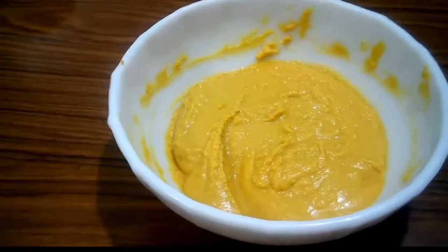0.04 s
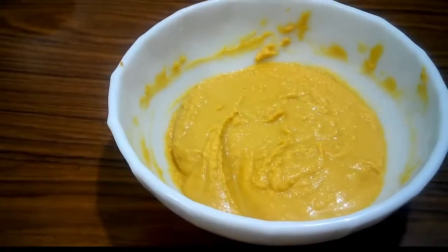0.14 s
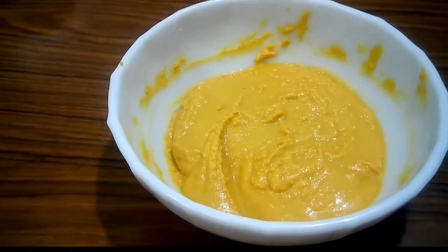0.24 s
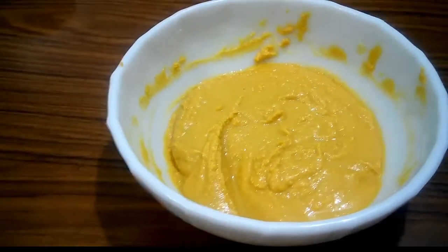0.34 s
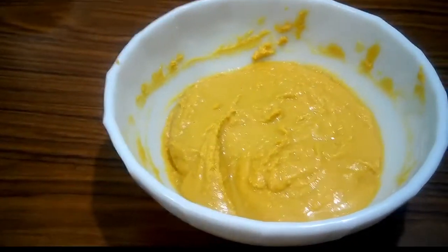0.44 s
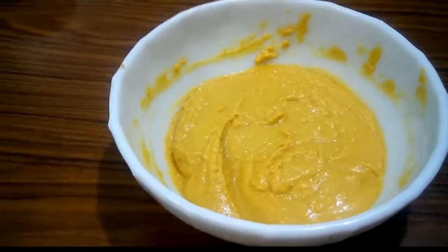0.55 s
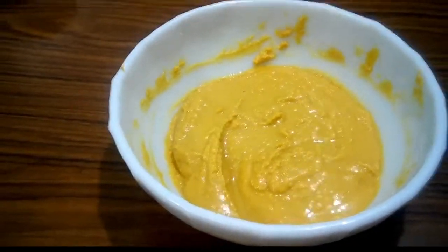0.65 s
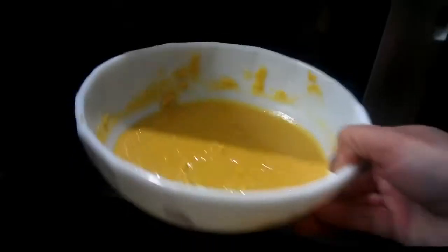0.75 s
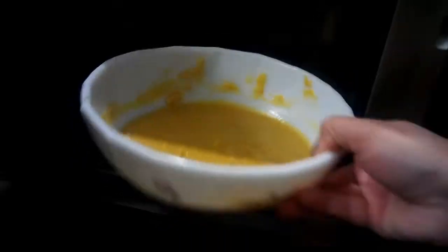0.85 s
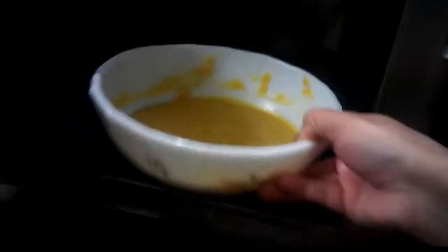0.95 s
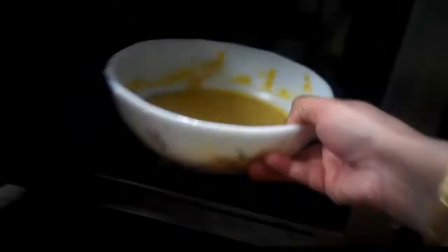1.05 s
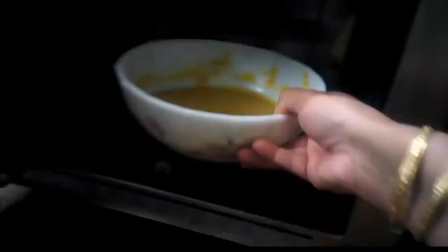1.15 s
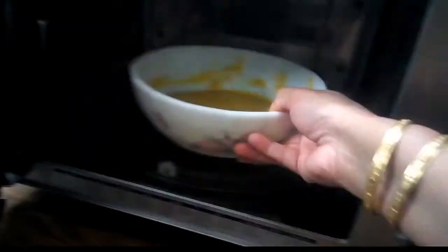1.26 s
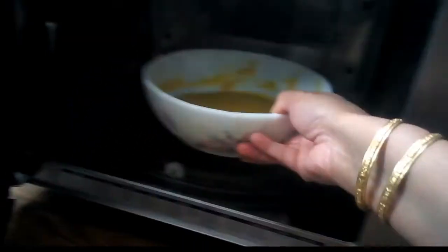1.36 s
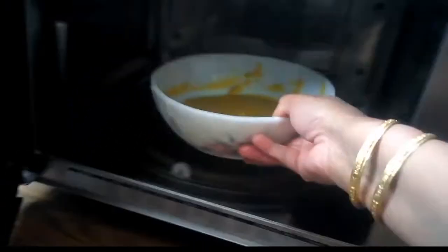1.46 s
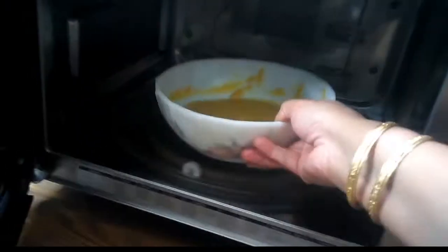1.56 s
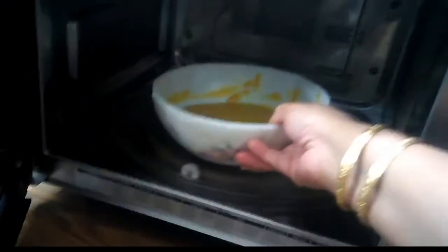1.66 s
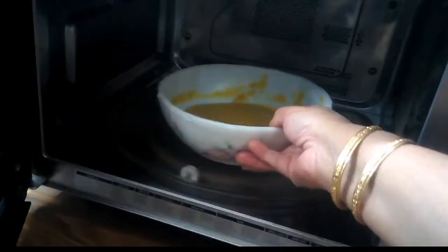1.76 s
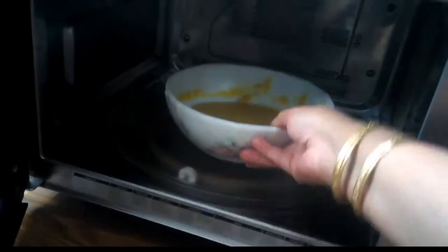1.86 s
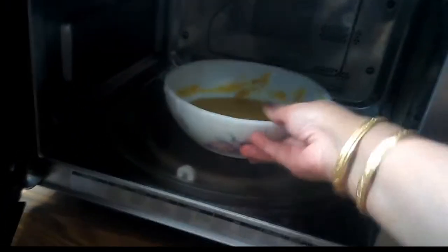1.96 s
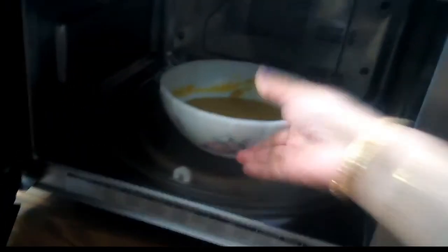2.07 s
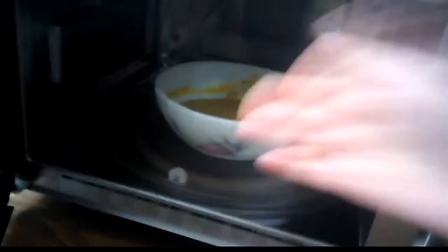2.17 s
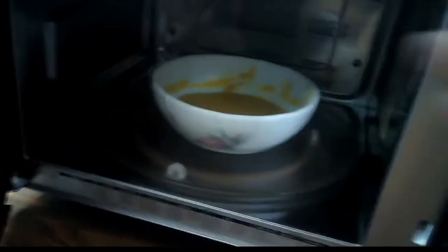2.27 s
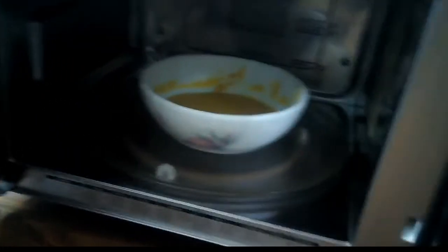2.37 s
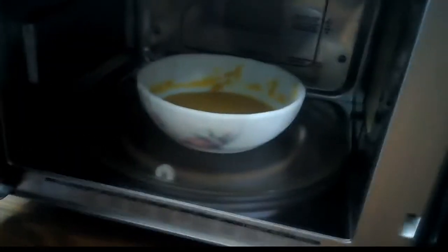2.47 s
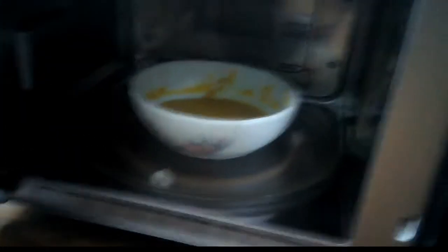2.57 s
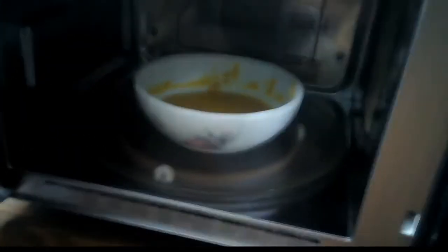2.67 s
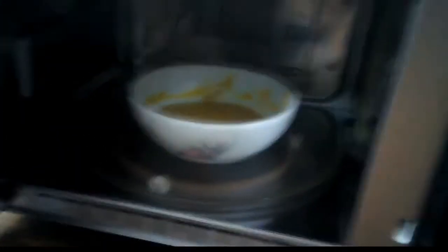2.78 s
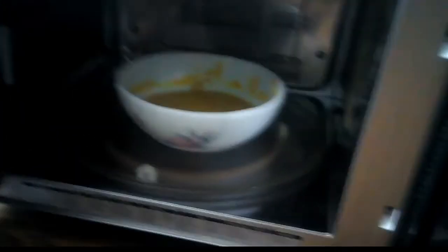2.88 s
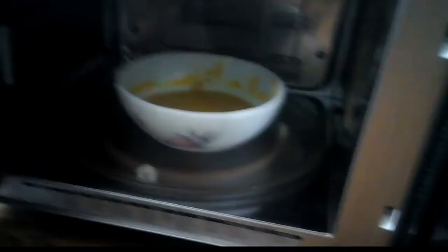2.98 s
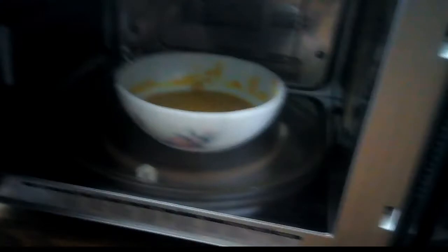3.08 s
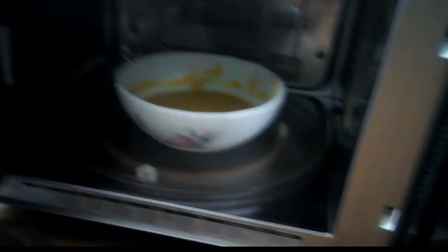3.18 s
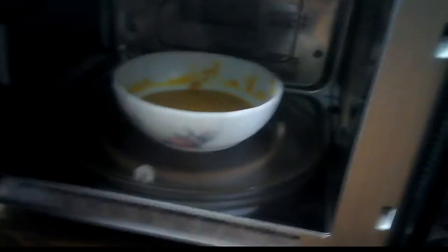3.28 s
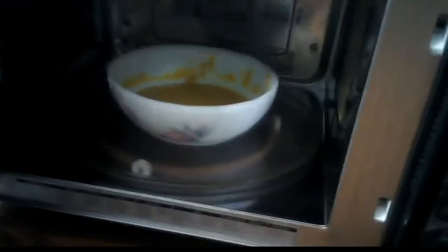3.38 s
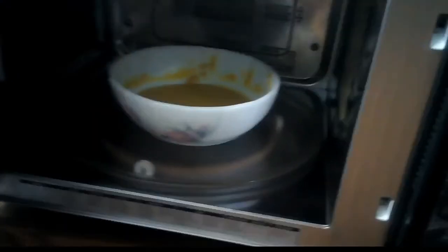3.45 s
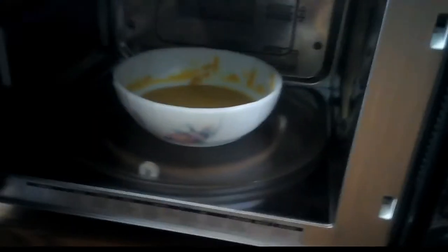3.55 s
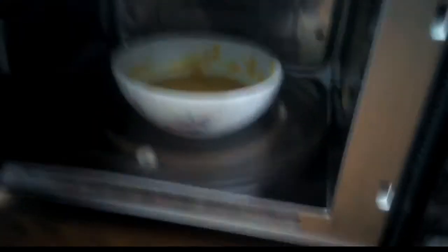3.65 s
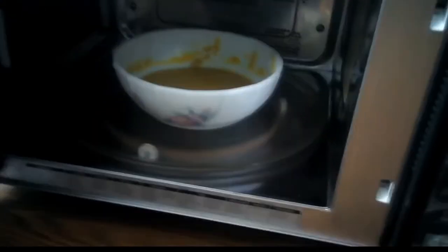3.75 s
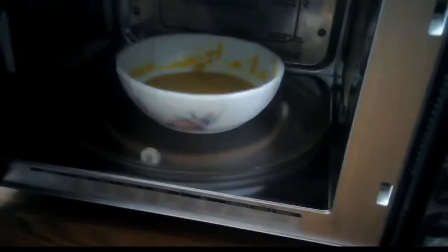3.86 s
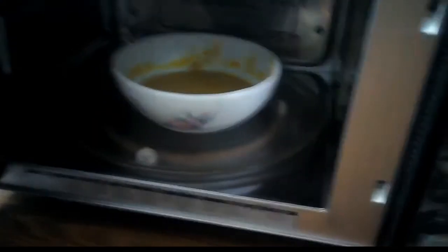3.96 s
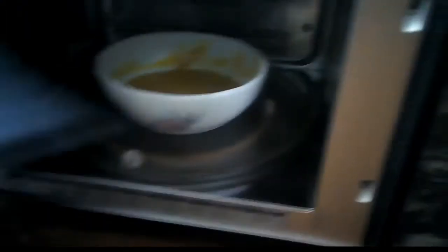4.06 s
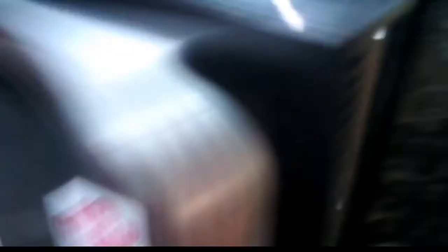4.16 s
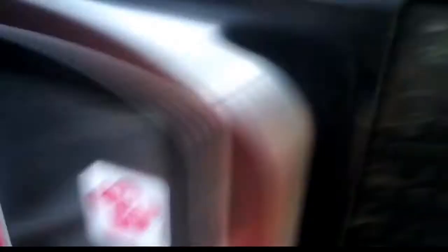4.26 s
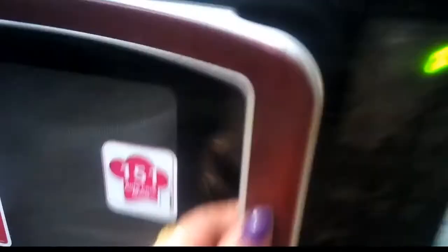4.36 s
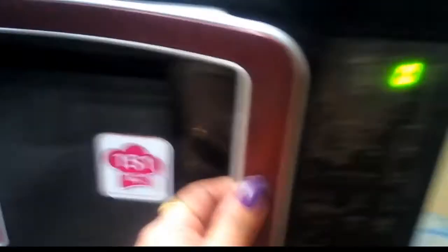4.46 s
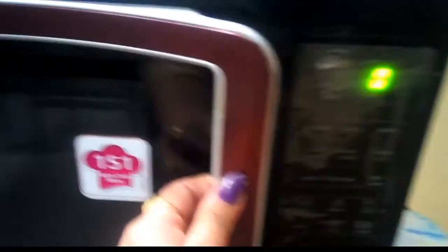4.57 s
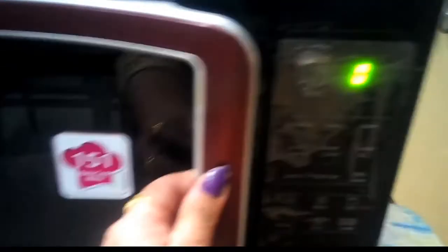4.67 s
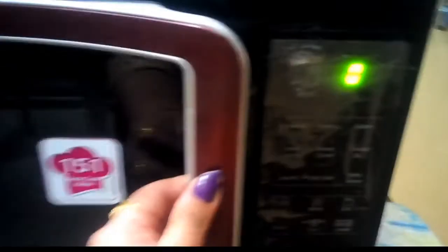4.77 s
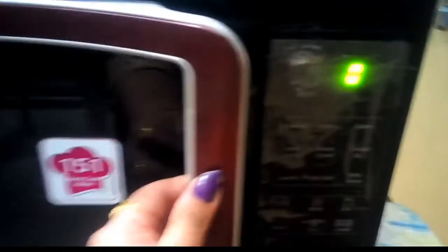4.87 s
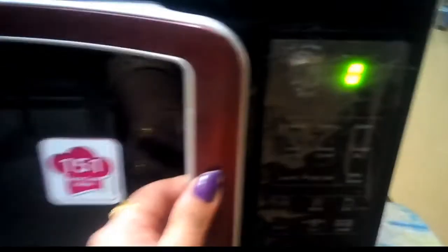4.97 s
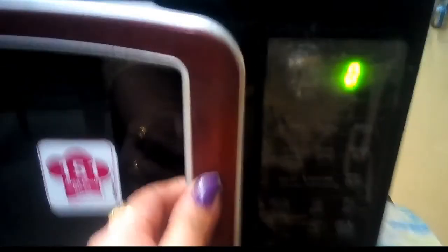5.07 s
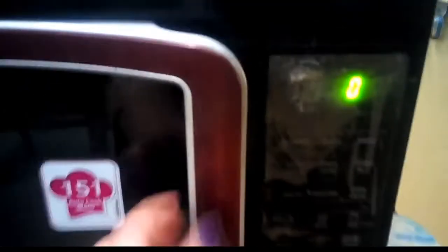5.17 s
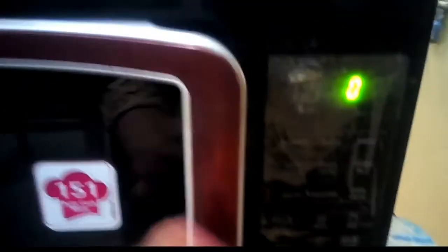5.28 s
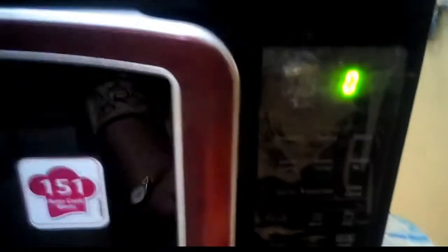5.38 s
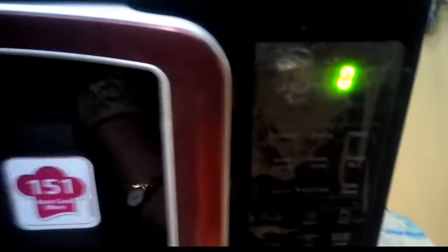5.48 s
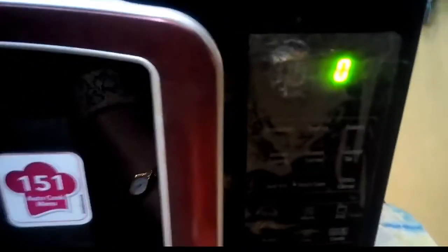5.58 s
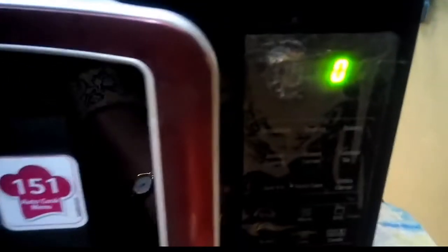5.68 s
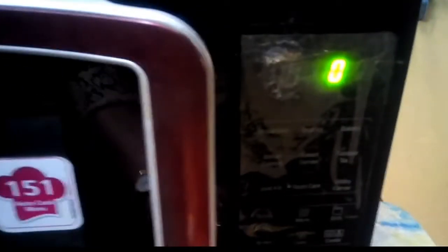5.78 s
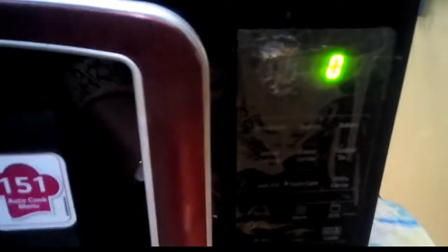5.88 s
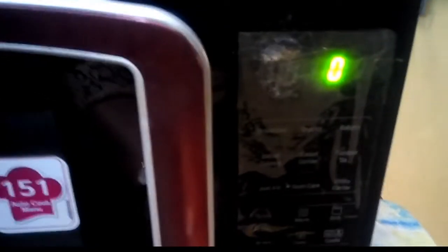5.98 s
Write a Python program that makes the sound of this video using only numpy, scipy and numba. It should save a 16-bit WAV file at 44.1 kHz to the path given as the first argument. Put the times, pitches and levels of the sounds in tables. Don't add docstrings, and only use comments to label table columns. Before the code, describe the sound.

Close phone pickup with soft room tone and hiss. A dry tick, a momentary silence, then a hard glassy clunk as a bowl lands, chatters and rocks on a glass plate inside an oven cavity. Cloth folds rustle and a catch clicks. A dull door knock with light rattle leads to a faint hinge drag, then a scrape and very sharp slam, ringing sheet metal and the tiled kitchen, with tiny settling ticks.

```python
import sys
import numpy as np
from scipy import signal
from scipy.fft import rfft, irfft, next_fast_len
from scipy.io import wavfile
from scipy.ndimage import uniform_filter1d, minimum_filter1d, map_coordinates
from numba import njit

SR = 44100
rng = np.random.default_rng(int(sys.argv[2]) if len(sys.argv) > 2 else 0)


def convert_level_to_amplitude(level_db):
    exponent = np.asarray(level_db, float) / 20
    return 10 ** exponent


def int16_out(signal):
    q = np.round(np.clip(np.atleast_2d(signal).T, -1, 1) * 32767)
    wavfile.write(sys.argv[1], SR, q.astype(np.int16))


N = 265923
T = np.arange(N) / SR

# start in seconds, level in dB, contact length in ms, brightest frequency in Hz.
SET_DOWN = [
    (1.9512, -23.5, 1.45, 9000),
    (1.9545, -12, 3.1, 3520),
    (1.9605, -23, 0.37, 16000),
    (1.9935, -20.5, 7, 2320),
    (2.008, -25, 6.3, 1840),
    (2.015, -19.5, 8, 1760),
    (2.024, -27.5, 8.4, 2330),
    (2.032, -28, 4.6, 2300),
]
ROCKING = [(2.174, -48, 7.5, 3230), (2.194, -50.5, 6.9, 11000), (2.193, -30, 8.6, 1540),
           (2.203, -41, 6.4, 5000), (2.228, -55, 9.8, 9200), (2.245, -52, 7.1, 8700),
           (2.318, -52.5, 240, 3800), (2.353, -52.5, 28, 10500), (2.38, -51, 28, 11000),
           (2.42, -56, 6.8, 7000)]
THUDS = [(1.955, -35, 5.3, 490), (2.192, -33, 28, 810), (2.203, -32.5, 5.4, 700), (2.26, -34.5, 21, 520),
         (2.438, -48, 15.4, 500), (2.55, -54.5, 19, 400), (2.655, -65, 16.3, 888), (2.76, -68, 16.5, 700)]
ROLLER_KNOCKS = [(2.174, -35.5, 0.7, 4010), (2.178, -41, 1, 3983), (2.185, -31.5, 0.79, 3990),
                 (2.192, -42, 2, 2500), (2.1975, -36, 0.99, 2010)]
BUMPS = [
    (1.953, -35.5, 17, 200),
    (2.05, -41, 40, 196),
    (2.2, -32.5, 23, 200),
    (2.33, -42, 36, 200),
    (4.13, -44, 30, 201),
]
# start in seconds, level in dB, contact length in ms, brightest frequency in Hz.
KNOCK = [(4.1105, -53, 13, 821), (4.117, -33, 5.9, 700), (4.139, -36, 2.4, 917), (4.146, -33.5, 3.5, 600),
         (4.152, -29, 3.3, 700), (4.172, -41.5, 3.6, 600), (4.19, -47.5, 9.6, 600), (4.48, -53.5, 24, 885)]
RATTLE = [(4.112, -57, 9.2, 3500), (4.132, -58, 2.4, 5030), (4.139, -44, 0.33, 5170),
          (4.1435, -47, 0.71, 4000), (4.19, -68.5, 10, 3500), (4.83, -63, 10, 1517)]
HOOKS = [
    (4.8485, -46.5, 3.9, 11000),
    (4.853, -34, 8.1, 9860),
    (4.872, -35, 6.2, 9000),
    (4.883, -37, 37, 3960),
    (4.895, -42.5, 19, 4000),
    (4.975, -45, 10, 500),
    (4.997, -39, 2.1, 9000),
    (5.004, -38.5, 12, 12000),
    (5.009, -19.5, 21, 9000),
]
SNAP = [
    (5.0146, -19.5, 0.051, 19150),
]
SETTLING = [(5.338, -48, 0.19, 4470), (5.352, -52, 0.6, 4000), (5.49, -55.5, 0.28, 3000),
            (5.586, -54.5, 0.79, 4400), (5.6, -54, 1, 2600), (5.768, -62.5, 0.15, 4000),
            (5.786, -61.5, 0.22, 6000)]
# start in seconds, level in dB, contact length in ms, brightest frequency in Hz.
TICKS = [(.482, -54, 5.3, 5000), (.4903, -34.5, 0.019, 12000), (.4922, -42.5, 0.045, 9000),
         (.5, -52, 6.7, 4000), (.575, -64, 8, 4000), (.615, -53.5, 0.1, 9000)]
BANGLE = [
    (.978, -62, 3.5, 7000),
    (1.01, -74, 5, 7000),
]
CLICKS = [(2.918, -56, 3.4, 14000), (2.986, -63, .5, 5000), (3.102, -52.5, 0.2, 5900),
          (3.368, -46, 0.084, 3010), (3.6, -56, 3.64, 3980), (3.77, -49, 4.6, 2996), (3.776, -43, 6, 4020),
          (3.787, -35, 2, 19030), (3.793, -46, 2, 6000)]
CATCH_SLIPS = [
    (3.7826, -47, 0.35, 1820),
    (3.7842, -35, 0.066, 2530),
    (3.7865, -46, 0.034, 9000),
    (3.789, -41.5, 0.043, 9000),
]

# frequency in Hz, level in dB, seconds to fade by 60 dB.
BOWL = [(1063, -13, 0.45), (1225, -20, 0.51), (1207, -4.5, 0.18), (1420, -16.5, 0.18), (1489, -9.5, 0.35),
        (1550, -17, 0.15), (2033, -10, 0.4), (2056, -5.5, 0.28), (2156, -11.5, 0.32), (2440, -13.5, 0.26),
        (2638, -22, 0.39), (3018, -8, 0.95), (3017, 1, 0.14), (3260, -9.5, 0.19)]
RIM = [(3560, -24, .07), (4160, -14.5, .15), (4770, -21.5, .4), (4858, -20.5, 0.34), (5483, -16, .24),
       (6611, -40.5, 0.17), (6939, -28.5, 0.082), (7870, -32.5, 0.1), (8489, -30, 0.14),
       (8320, -33.5, 0.16), (9631, -28, .08), (9800, -39.5, 0.5), (9610, -39, .5), (10450, -34, 0.13)]
TILTED_BOWL = [(1006, -27.5, 0.15), (1317, -9.5, 0.1), (2245, 5, 0.06), (3100, 1, 0.13),
               (4230, -5.5, 0.097), (4860, -23.5, 0.22), (5540, -20, 0.15), (8590, -16, 0.19),
               (9670, -11, 0.15)]
PLATE = [(351.5, -23, .6), (438, -23.5, 0.94), (600, -8.5, 0.28), (850, -25, .3)]
LOOSE_PLATE = [(276, -12, .3), (320, 5.5, .05), (325, -12, 0.84), (331.4, -13, 0.5), (375, -21, .3),
               (450.7, -20.5, .2), (598, 1.5, 0.23), (638, -17, .2)]
ROLLER = [(601, -6.5, 0.069), (1068, -1.5, 0.17), (1440, -13, 0.042), (2331, 7, 0.055), (3596, 9, 0.053)]
# frequency in Hz, level in dB, seconds to fade by 60 dB.
DOOR = [(237.3, -14, 0.202), (316, -14.5, 0.11), (385, -15.5, 0.16), (443, -6, 0.06), (657, -11, 0.099),
        (700, -18.5, 0.2)]
CASE = [(85, -6, 0.69), (115.5, -16, 1), (208.6, -16, 0.49), (268, -22, 0.57), (385, -10.5, 0.53),
        (440.7, -9.5, 0.39), (558, -9.5, 0.41), (600, -21.5, 0.14), (696, -26, 0.76), (1016, -14.5, 0.3),
        (1170, -18, 0.52),
        (1910, -14.5, 0.3), (2265, -29, 0.51), (2394, -22, .45), (2570, -23.5, 0.57), (3070, -25.5, 0.3),
         (3280, -22.5, .35)]
LATCH = [(202.5, 5.5, 0.038), (400, 3.5, 0.049), (1310, 4.5, 0.013), (2930, 17.5, 0.011), (4220, 11, .01),
         (5440, 7.5, 0.0092), (10010, 6, .006), (13470, 3.5, 0.0044)]
TRIM = [(2313, -10.5, .3), (2450, -7, 0.27), (2650, 0.5, 0.043), (3500, -7, 0.036), (4400, -5, 0.0195)]
# frequency in Hz, level in dB, seconds to fade by 60 dB.
BANGLE_TONES = [(4570, -3, 0.064), (4740, -5, 0.042)]
CATCH = [(490, -12, 0.031), (1414, -5, 0.0089), (2236, -7, 0.0088), (2846, -13, 0.017), (3340, -1, .015),
         (4500, -14, 0.0088), (5540, -20, 0.022), (6900, -19, .012)]
CREASE = [(2060, -13, 0.037), (2520, 0, 0.021), (2950, -10, 0.13), (3450, -0.5, 0.04)]

# frequency in Hz, level in dB per Hz.
GLASS_TAIL = [(59, -55), (100, -25), (323, -4.5), (923, -19), (1180, -7.5), (2050, -22), (2410, -24.5),
              (3090, -14), (7000, -52.5), (9100, -84.5), (15400, -120)]
WORKTOP = [(30, -10.5), (60, 0), (110, 0.5), (170, -8), (300, -29), (1000, -77)]
# frequency in Hz, level in dB per Hz.
KNOCK_TAIL = [(35, -61.5), (60, -24.5), (172, -37), (242, -2), (320, -23.5), (440, -13), (495, -17),
              (536, -23), (4010, -35.5), (7000, -9), (9100, -99), (15400, -120)]
HINGE = [(70, -17), (140, 11), (260, -8.5), (500, -4.5), (1000, 1.5), (1500, -9), (3000, -13.5),
         (6000, -29)]
GRIT = [(300, -24), (1000, -7), (3000, -4), (4200, -3.5), (7000, -20.5), (11000, -26.5), (15500, -42.5)]
HOOK_TAIL = [(35, -48), (60, -19), (194, 5.5), (310, -27), (432, -1.5), (821, -21.5), (1000, -8),
             (2490, -13.5), (6600, -32.5), (9830, -57), (12000, -57), (15600, -88)]
CRACK = [(88, -28.5), (150, -18.5), (411, 0), (812, -18), (1370, -6.5), (2140, -27), (2920, -0.5),
         (3760, -13), (4310, -16), (5650, -21.5), (8330, -26), (9920, -11), (15500, -42.5)]
SLAM_TAIL = [(50, -43.5), (80, -6), (130, -2), (240, 1.5), (500, -3), (780, -8.5), (1150, -8),
             (1500, -10.5), (2400, -10), (3800, -13), (5200, -26), (7000, -37), (9700, -19), (11300, -34),
             (13500, -31), (15500, -40)]
KITCHEN = [(41, -45.5), (70, -8.5), (150, -3), (411, -14), (504, -15.5), (731, -14.5), (1060, -15.5),
           (2690, -22), (3980, -38), (6000, -37), (7800, -78.5), (13200, -120)]
# frequency in Hz, level in dB per Hz.
TICK = [(120, -47), (200, -20), (641, 6.5), (1840, -8.5), (2290, -1), (3890, -2.5), (4660, 1),
        (5200, -19.5), (8050, -17.5), (9480, -39), (13600, -35), (15500, -51)]
CLICK = [(120, -46), (200, -35), (471, 0.5), (728, -17), (1380, -5), (2560, -10.5), (3360, -4),
         (3820, -14.5), (4580, -6), (6130, -14), (10600, -13.5), (15500, -27)]
CLOTH_LOW = [(410, -32), (700, -15.5), (780, -12), (853, -20), (1050, -9), (1130, -10), (2980, -5),
             (6000, -26), (7800, -53), (13200, -120)]
CLOTH_HIGH = [(3530, -54), (6000, -20), (7950, -11), (9100, -9), (10300, -5.5), (12500, -4.5), (14000, -7),
              (15500, -11)]
AIR = [(15, -51), (25, -15), (133, -6.5), (261, -6.5), (328, -9.5), (576, -10), (772, -10.5), (1040, -14),
       (1160, -15.5), (2860, -20), (5500, -24.5), (7150, -51), (12100, -120)]
HISS = [(3240, -33.5), (5500, -9), (5980, -6), (6630, 1.5), (7240, -2), (7900, 1), (9280, -2), (10700, -5),
        (12600, -5.5), (14900, -7), (15600, -13)]
# frequency in Hz, seconds to fade by 60 dB.
ROOM_T60 = [(60, 1), (150, 0.88), (400, 1), (1000, .85), (2500, 0.79), (4000, 0.8), (6000, 0.4),
            (10000, 0.34), (14000, 0.14)]

# peak in seconds, level in dB, rise and fall in ms per 10 dB.
DRAGS = [
    (4.22, -71.5, 20, 600),
    (4.475, -68.5, 230, 220),
    (4.81, -70, 17, 200),
]
# peak in seconds, level in dB, rise and fall in ms per 10 dB, fibre hiss over fold in dB.
FOLDS = [(.2, -71.5, 23, 130, -15), (.32, -70, 69, 45, -14), (2.94, -64, 10, 73, -12),
         (2.987, -55, 3.1, 64, -7.5), (3.108, -57, 13, 15, -25), (3.136, -50.5, 12.5, 12.5, -1.5),
         (3.199, -71, 51, 122, 2.5), (3.314, -60.5, 24, 19, -19), (3.417, -54.5, 24, 20, -4.5)]
# peak in seconds, level in dB, rise and fall in ms per 10 dB.
WHINE = [(.1, -80, 300, 300), (.33, -91, 100, 100), (.66, -73, 200, 30), (1.0, -82, 120, 100),
         (1.55, -86, 200, 200)]
AIR_DB = -75, -75.5
SCENE_DB = 4, 4.5
BACK_S = 0.732


def bowl():
    down = contacts(SET_DOWN, 480)
    rock = contacts(ROCKING, 276)
    thud = contacts(THUDS, 240)
    rollers = contacts(ROLLER_KNOCKS, 450, clean=True)
    glass = ring(down, BOWL, grip()) + ring(down, RIM)
    glass = glass + convert_level_to_amplitude(3.0) * ring(rock, TILTED_BOWL, longest=0.45)
    plate = convert_level_to_amplitude(-4.5) * ring(down, PLATE) + convert_level_to_amplitude(1) * ring(thud, LOOSE_PLATE)
    cavity = convert_level_to_amplitude(-15.5) * wash(down, GLASS_TAIL, 0.7, 6)
    cavity = cavity + convert_level_to_amplitude(-4.0) * wash(rock + 0.5 * thud, GLASS_TAIL, 0.66, 1.6)
    rub = convert_level_to_amplitude(14) * wash(rock, GLASS_TAIL, 0.051, 0.54)
    worktop = convert_level_to_amplitude(-14) * wash(contacts(BUMPS, 30), WORKTOP, 0.2, 4.4)
    return glass + plate + ring(rollers, ROLLER) + cavity + rub + convert_level_to_amplitude(3.0) * thud + worktop


def grip():
    held, squeeze, free, seated = 2.3, 21, 0.34, 5.5
    late = (T - 2.034) * 1000 / 5.0
    after = np.where(T < ROCKING[0][0], free, seated)
    return np.where(late < 0, held, after) + squeeze * np.exp(-late ** 2)


def door():
    sweep = swells(DRAGS).sum(axis=1) * colour(rng.standard_normal(N), HINGE)
    sound = door_knock() + sweep + door_shutting()
    return signal.lfilter(*signal.butter(5, 100, "high", fs=SR), sound)


def door_knock():
    knock, rattle = contacts(KNOCK), contacts(RATTLE, 1700)
    panel = ring(knock, DOOR) + convert_level_to_amplitude(-11.0) * wash(knock, KNOCK_TAIL, 0.75, 2.1)
    trim = convert_level_to_amplitude(5.5) * wash(rattle, TICK, 0.043, 0.26) + convert_level_to_amplitude(-9.5) * wash(rattle, TICK, 0.59, 4.1)
    return panel + trim


def door_shutting():
    hooks, settle = contacts(HOOKS), contacts(SETTLING, 257)
    snap = contacts(SNAP, 130, clean=True)
    scrape = convert_level_to_amplitude(13.5) * colour(hooks, GRIT) + convert_level_to_amplitude(6.5) * wash(hooks, SLAM_TAIL, 0.057, 0.18)
    scrape = scrape + convert_level_to_amplitude(-8.5) * wash(hooks, HOOK_TAIL, 0.78, 3.8)
    crack = convert_level_to_amplitude(13.0) * wash(snap, CRACK, 0.015, 0.2)
    metal = ring(snap, LATCH) + ring(snap + convert_level_to_amplitude(-4.5) * hooks, CASE)
    slam = crack - metal + convert_level_to_amplitude(-4.5) * wash(snap, SLAM_TAIL, 0.7, 1.7)
    room = convert_level_to_amplitude(-19.5) * wash(snap, KITCHEN, 1.67, 30) + convert_level_to_amplitude(4) * wash(settle, KITCHEN, 0.5, 8)
    return scrape + slam + room + convert_level_to_amplitude(-0.5) * ring(settle, TRIM)


def ticks():
    out = ring(contacts(BANGLE), BANGLE_TONES)
    out = out + ring(contacts(CATCH_SLIPS, 450, clean=True), CATCH)
    for rows, spectrum, tail_db in ((TICKS, TICK, -26), (CLICKS, CLICK, -32)):
        force = contacts(rows, 590)
        out = out + convert_level_to_amplitude(1.0) * wash(force, spectrum, 0.021, 0.29)
        out = out + convert_level_to_amplitude(tail_db) * wash(force, spectrum, 0.41, 4)
    return out


def sleeve():
    grit = rng.standard_normal((2, N))
    size = np.minimum(rng.exponential(size=N), 7)
    folds = colour(grit[0] * convert_level_to_amplitude(1.8 * size), CLOTH_LOW)
    fibres = colour(grit[1] * convert_level_to_amplitude(1.2 * size), CLOTH_HIGH)
    creases = drifting(ring(folds, CREASE))
    folds = convert_level_to_amplitude(-1) * folds / folds.std() + convert_level_to_amplitude(-5.5) * creases / creases.std()
    hiss = swells([(s + 0.0039, db + up, rise, fall) for s, db, rise, fall, up in FOLDS])
    return swells(FOLDS).sum(axis=1) * folds + hiss.sum(axis=1) * fibres / fibres.std()


def drifting(x):
    share, changes_hz = 0.045, 14
    size = int(SR / changes_hz)
    steps = np.repeat(rng.standard_normal(N // size + 1), size)[:N]
    walk = uniform_filter1d(steps, size=size)
    return map_coordinates(x, [np.cumsum(1 + share * walk)], mode="mirror")


def air():
    wander = np.cumsum(0.066 * rng.standard_normal(N))
    whine = np.sin(2 * np.pi * 4120 * T + wander)
    tone = convert_level_to_amplitude(2.5) * colour(rng.standard_normal(N), AIR)
    tone = tone + convert_level_to_amplitude(-0.5) * colour(rng.standard_normal(N), HISS)
    return convert_level_to_amplitude(np.where(T < BACK_S, *AIR_DB)) * tone + swells(WHINE).sum(axis=1) * whine


def contacts(rows, low_hz=100, clean=False):
    size = 2048
    force = np.zeros(N)
    age_ms = T[:size] * 1000
    bass_cut = signal.butter(2, low_hz, "high", fs=SR)
    for (s, db, ms, hz), grit in zip(rows, rng.standard_normal((len(rows), size))):
        age = age_ms / ms
        burst = (1 if clean else grit) * np.sqrt(age) * np.exp(-2.5 * age)
        burst = burst / np.sqrt(np.sum(burst ** 2))
        burst = signal.lfilter(*signal.butter(3, min(hz, 0.45 * SR), fs=SR), burst)
        start = int(s * SR)
        force[start:start + size] += convert_level_to_amplitude(db) * signal.lfilter(*bass_cut, burst)
    return force


@njit
def resonate(x, turn, loss, damping):
    y, z = np.zeros(len(x)), 0j
    for i in range(len(x)):
        z = z * turn * (1 - loss * damping[i]) + x[i]
        y[i] = z.imag
    return y


def ring(force, modes, damping=np.ones(N), longest=1.2):
    out = np.zeros(N)
    for hz, db, t60 in modes:
        turn = np.exp(2j * np.pi * hz / SR)
        loss = np.log(1000) / (min(t60, longest) * SR)
        out = out + convert_level_to_amplitude(db) * resonate(force + 1e-18, turn, loss, damping)
    return out


def wash(force, spectrum, stretch, onset_ms):
    size = 1 << 16
    hz = np.fft.rfftfreq(size, 1 / SR)
    noise = rfft(colour(rng.standard_normal(size), spectrum))
    tail = np.zeros(size)
    for centre in 2 ** np.arange(5.5, 14.6, 0.5):
        band = irfft(noise * np.clip(1 - abs(2 * np.log2((hz + 1) / centre)), 0, 1))
        fade_db = -60 * T[:size] / (stretch * on_log(ROOM_T60, centre))
        tail = tail + band * convert_level_to_amplitude(np.maximum(fade_db, -200))
    tail = tail * (1 - np.exp(-T[:size] * 1000 / onset_ms))
    return signal.oaconvolve(force, tail)[:N]


def colour(x, spectrum):
    size = next_fast_len(len(x))
    gain = convert_level_to_amplitude(on_log(spectrum, np.fft.rfftfreq(size, 1 / SR)))
    return irfft(rfft(x, size) * gain, size)[:len(x)] / np.sqrt(np.mean(gain ** 2))


def on_log(table, hz):
    return np.interp(np.log(hz + 1), np.log([r[0] for r in table]), [r[1] for r in table])


def swells(rows):
    s, db, rise, fall = np.array([r[:4] for r in rows]).T
    late = (T[:, None] - s) * 1000
    return convert_level_to_amplitude(np.maximum(db - 10 * np.maximum(-late / rise, late / fall), -200))


def scene_change():
    faded_db = -22
    out = SCENE_DB[0] + faded_db * np.clip((T - 0.612) * 1000 / 50, 0, 1)
    back = SCENE_DB[1] + faded_db * np.clip(1 - (T - BACK_S) * 1000 / 28, 0, 1)
    return np.where(T < 0.691, convert_level_to_amplitude(out), convert_level_to_amplitude(back) * (T > BACK_S))


def scene():
    mix = bowl() + door() + ticks() + sleeve() + air()
    return (mix * scene_change())[None]


def roll_off(x):
    return signal.sosfilt(signal.butter(12, 16330, fs=SR, output="sos"), x)


def record(dry):
    x = signal.sosfilt(signal.butter(2, 50, "high", fs=SR, output="sos"), dry)
    x = signal.sosfilt(signal.ellip(8, 0.2, 60, 15600, fs=SR, output="sos"), x)
    room_left = minimum_filter1d(np.minimum(0.95 / (abs(x) + 1e-9), 1), size=129)
    return roll_off(x * uniform_filter1d(room_left, size=65))


dry = scene()
out = record(dry)
int16_out(out)
```